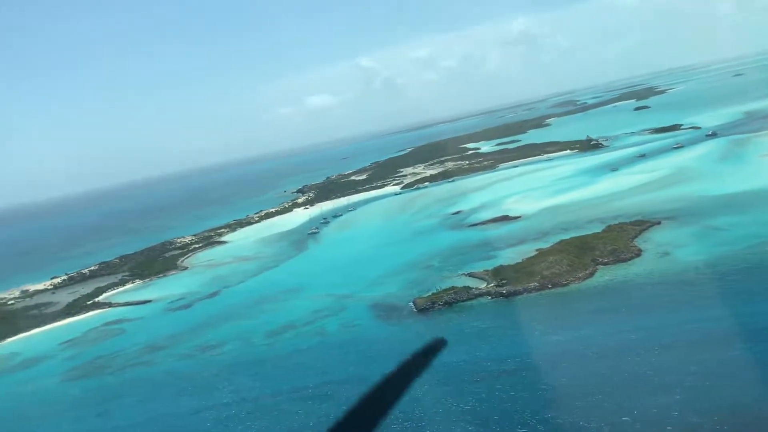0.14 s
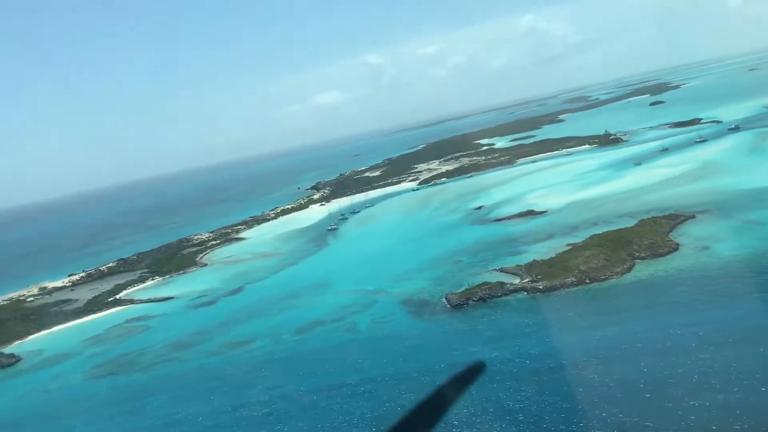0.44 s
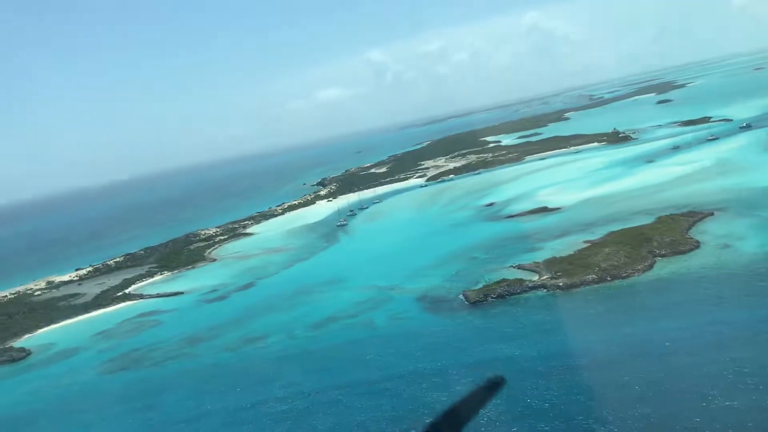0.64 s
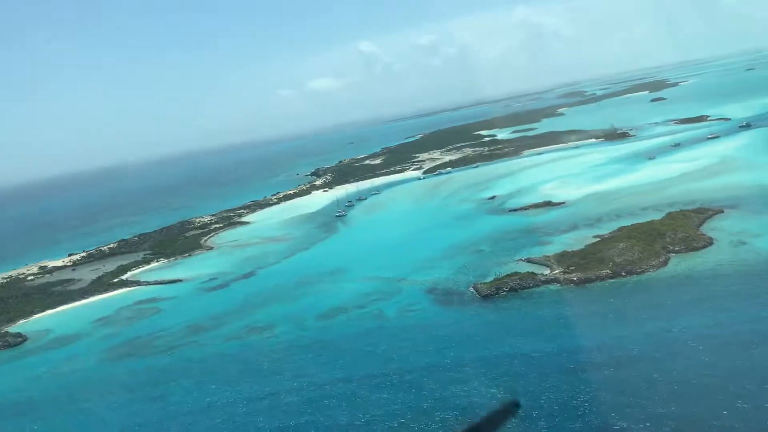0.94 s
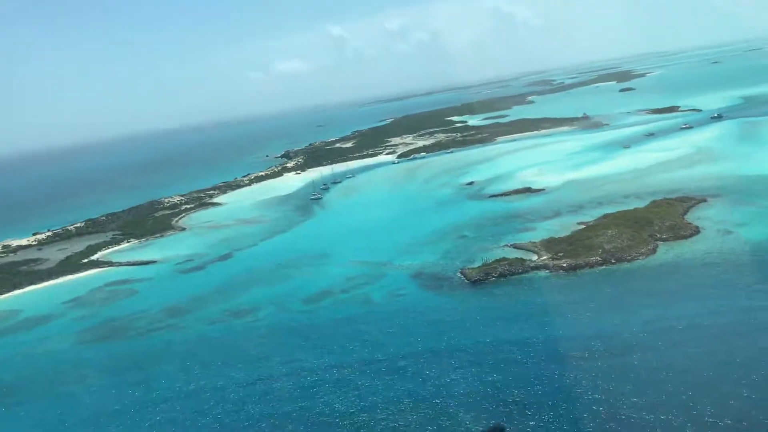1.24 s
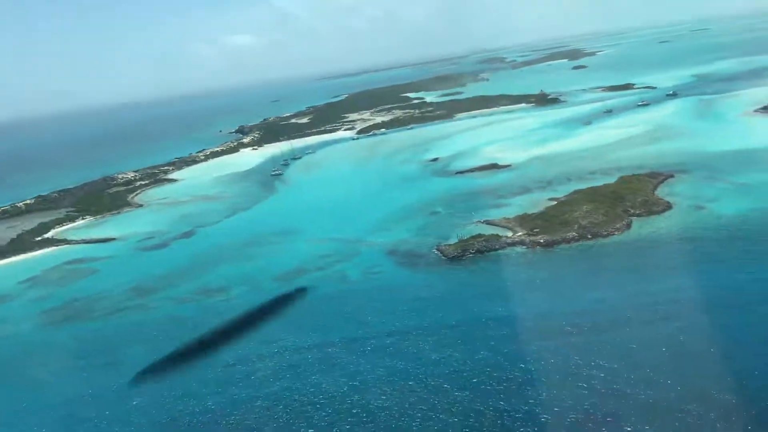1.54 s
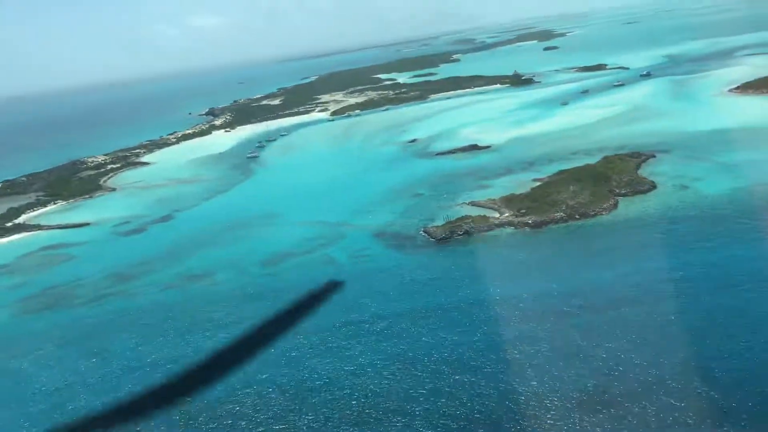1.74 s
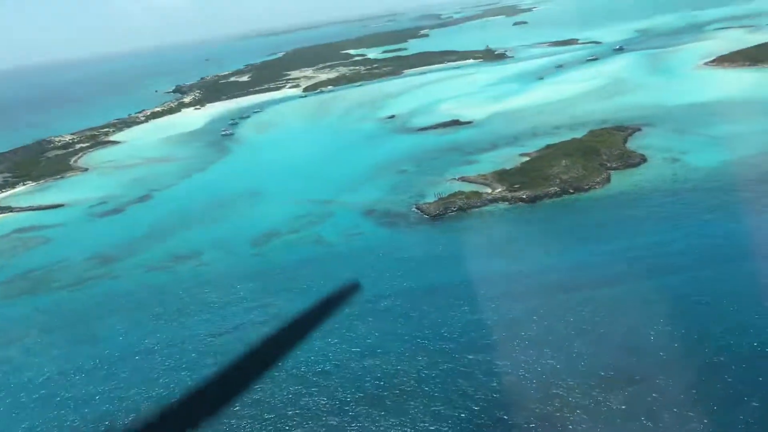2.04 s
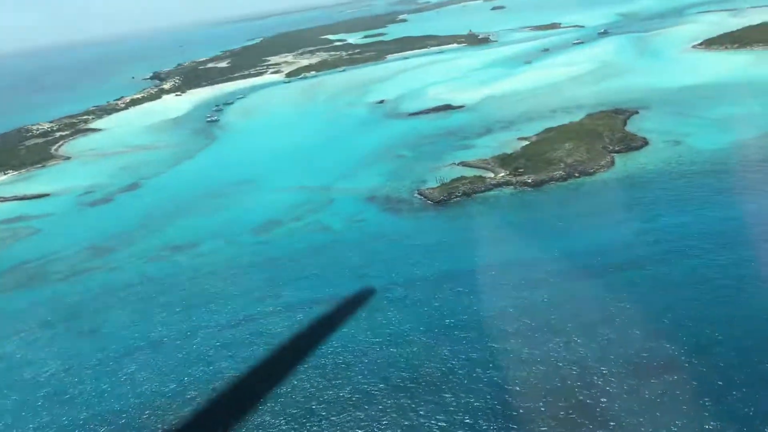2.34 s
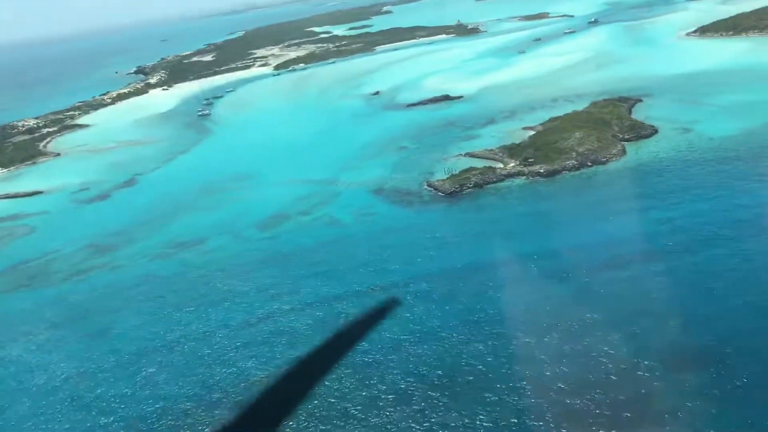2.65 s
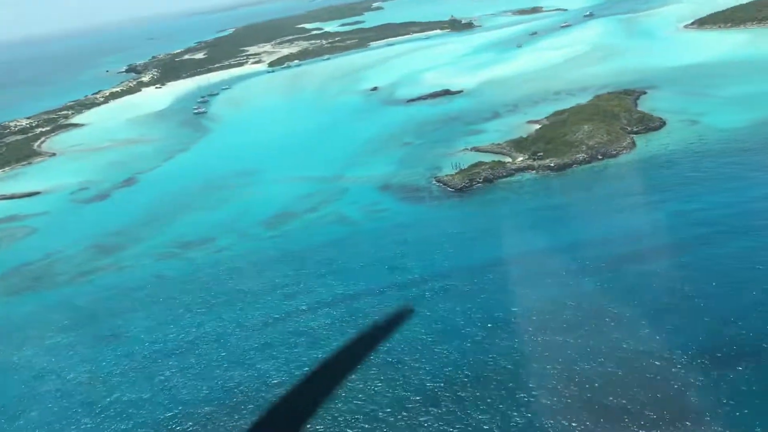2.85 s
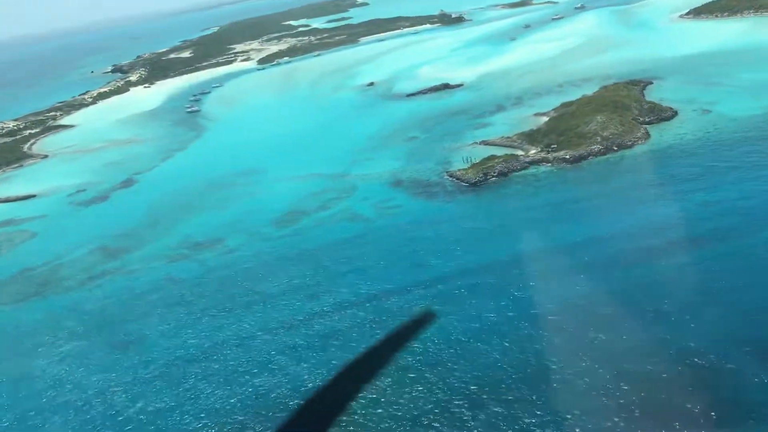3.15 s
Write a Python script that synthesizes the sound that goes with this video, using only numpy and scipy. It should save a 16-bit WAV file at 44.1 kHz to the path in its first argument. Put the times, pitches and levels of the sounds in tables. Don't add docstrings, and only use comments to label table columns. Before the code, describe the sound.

Twin piston engines of a small propeller plane drone in cruise, heard inside the cabin from a handheld camera by the window. The low hum starts weaker and rougher, swells to full by about 0.5 seconds, then throbs steadily, easing slightly near 2.3 seconds. Fuselage rumble and quiet air hiss continue throughout; a barely audible airy whistle fades around 1.6 seconds and returns toward the end at 3.3.

```python
import sys
import numpy as np
from scipy import signal
from scipy.io import wavfile
from scipy.ndimage import uniform_filter1d

SR = 44100
rng = np.random.default_rng(int(sys.argv[2]) if len(sys.argv) > 2 else 0)


def volts_from_decibels(level):
    exponent = np.asarray(level, float) / 20
    return 10 ** exponent


def wrap_up_sound(samples):
    columns = np.atleast_2d(samples).T
    tamed = np.clip(columns, -1, 1)
    steps = np.round(tamed * 32767).astype(np.int16)
    wavfile.write(sys.argv[1], SR, steps)


N = 145530
T = np.arange(N) / SR


def evened(x):
    return x / np.sqrt(np.mean(abs(x) ** 2) + 1e-20)


def curve(table, column):
    rows = np.array(table, float)
    return np.interp(T, rows[:, 0], rows[:, column])


def read_spectrum(points, hz):
    f, value = np.transpose(points)
    return np.interp(np.log(hz + 1), np.log(f + 1), value)


def noise(shape_db, patchy_db, streaky_db, size):
    streak_top_hz = 15000
    hz = np.fft.rfftfreq(size, 1 / SR)
    frames = 4 * N // size + 5
    real, imag, patches, streaks = rng.standard_normal((frames, len(hz), 4)).T
    patches = uniform_filter1d(patches, size=14, axis=0)
    patches = evened(uniform_filter1d(patches, size=20, axis=1))
    streaks = uniform_filter1d(streaks, size=2, axis=0)
    streaks = evened(uniform_filter1d(streaks, size=40, axis=1))
    streaks = streaks * np.clip(2 - 2 * hz / streak_top_hz, 0, 1)[:, None]
    level_db = shape_db(hz)[:, None] + patchy_db * patches + streaky_db * streaks
    spectra = (real + 1j * imag) * volts_from_decibels(level_db)
    sound = signal.istft(spectra, nperseg=size, noverlap=3 * size // 4)[1]
    return evened(sound[:N])


# time in seconds, level of engine order 6 (the firing) in dB, order 9 in dB,
# order 12 in dB, slipstream in dB, shaking of the airframe in dB.
FLIGHT = [(0, -45, -22, -30, -40.5, 1), (.2, -30.5, -21.5, -33.5, -37.5, 4), (.35, -17, -34, -27, -38, 2.5),
          (.5, -15.5, -25.5, -24, -37.5, 2.5), (.62, -13.5, -35, -23.5, -38, 1),
          (.85, -13, -31.5, -23, -38.5, 1), (1.15, -12.5, -31, -23, -40, 0.5),
          (1.4, -13, -24, -29, -40.5, -1.5), (1.62, -12.5, -23.5, -31.5, -41, -6),
          (1.85, -14, -29.5, -34, -41.5, -0.5), (2.12, -13, -28.5, -27, -41.5, -3.5),
          (2.28, -17, -28.5, -29, -40.5, -3), (2.45, -15.5, -29, -25, -40.5, -3.5),
          (2.62, -15.5, -41, -25.5, -40.5, -1.5), (2.78, -14.5, -22, -28, -40.5, -2),
          (2.92, -16, -30.5, -25, -39, -0.5), (3.05, -13.5, -31, -27, -41, 0),
          (3.3, -17.5, -28, -27, -38, -1.5)]


def shaking(share):
    return volts_from_decibels(share * curve(FLIGHT, column=5))


# time in seconds, engine cycles per second in Hz.
CYCLE_SPEED = [
    (0, 19.94),
    (.5, 19.93),
    (1.5, 19.91),
    (2.3, 19.93),
    (3.3, 19.945),
]
BEATING = (6, 9, 12)
# multiple of the cycle speed, level in dB (unused for the beating orders).
ORDERS = [(2, -26), (3, -14.5), (4, -22), (5, -15.5), (6, 0), (7, -26), (8, -29), (9, -14), (10, -25.5),
          (12, -13), (14, -35.5), (15, -25.5), (16, -37.5), (17, -33.5), (18, -25), (20, -39), (21, -38),
          (22, -44), (24, -35.5), (26, -45), (28, -53), (30, -41), (33, -43), (36, -48), (42, -41.5),
          (46, -42), (48, -53.5), (54, -44.5), (62, -48.5)]


def engines():
    wander, wander_hz = 0.4, 2.2
    weak_db, shaking_share = -13.5, 0.85
    slip_hz, aligned_s = 0.16, 0.9
    turn = 2 * np.pi * np.cumsum(curve(CYCLE_SPEED, column=1)) / SR
    coarse = T[::441]
    skin = shaking(shaking_share)
    drone = np.zeros(N)
    for k, db in ORDERS:
        if k in BEATING:
            level = volts_from_decibels(curve(FLIGHT, column=1 + BEATING.index(k)))
            phase = k * turn
            if k == 12:
                phase = phase + 2 * np.pi * slip_hz * (T - aligned_s)
            drone -= np.sqrt(2) * level * np.cos(phase)
            continue
        start = rng.random()
        phases = rng.random(12)
        rates = rng.exponential(1, 12) * rng.choice([-1, 1], 12)
        turns = np.exp(2j * np.pi * (wander_hz * rates * coarse[:, None] + phases))
        drift = 1 + wander * evened(turns.sum(1))
        drift = np.interp(T, coarse, drift.real) + 1j * np.interp(T, coarse, drift.imag)
        tone = (drift * np.exp(1j * (k * turn + 2 * np.pi * start))).real
        drone += np.sqrt(2) * volts_from_decibels(weak_db + db) * skin * tone
    return drone, turn


# pitch in Hz, level in dB per Hz.
RUMBLE_COLOUR = [(30, -22), (62, -1.5), (160, -3.5), (228, -9), (285, -8), (325, -15.5), (600, -37),
                 (3000, -95)]


def rumble():
    def shape_db(hz):
        return read_spectrum(RUMBLE_COLOUR, hz)
    return volts_from_decibels(-26.5) * shaking(1) * noise(shape_db, patchy_db=1.2, streaky_db=0, size=4096)


# pitch in Hz, level in dB per Hz.
STREAM_COLOUR = [(250, -16), (380, -7.5), (550, -13), (1300, -15), (2600, -23), (6600, -24.5), (8500, -30),
                 (15600, -39)]
# pitch in Hz, width in Hz, boost in dB.
PORTS = [(760, 53, -2.5), (910, 195, 4), (995, 58, -5), (2210, 140, 0.5), (2410, 110, -1),
         (4970, 440, -4.5), (6460, 1600, 1.5), (10600, 350, -2), (11040, 500, 5.5)]


def slipstream(turn):
    throb = 0.035
    def shape_db(hz):
        ringing = sum(db / (1 + (2 * (hz - f) / width) ** 2) for f, width, db in PORTS)
        return read_spectrum(STREAM_COLOUR, hz) + ringing
    chop = 1 + throb * np.cos(BEATING[0] * turn)
    level = volts_from_decibels(3.5 + curve(FLIGHT, column=4))
    return level * chop * noise(shape_db, patchy_db=0.9, streaky_db=2.1, size=1024)


# time in seconds, centre pitch in Hz, level in dB.
LEAK = [
    (0, 4210, -55),
    (.5, 4330, -53),
    (1.1, 4320, -55),
    (1.6, 4100, -68.5),
    (2.6, 3917, -60),
    (3.3, 3970, -45.5),
]


def leak():
    width_hz = 420
    r = np.exp(-np.pi * width_hz / SR)
    base = rng.standard_normal(N) + 1j * rng.standard_normal(N)
    slow = signal.lfilter([1], np.convolve([1, -r], [1, -r]), base)
    phase = 2 * np.pi * np.cumsum(curve(LEAK, column=1)) / SR
    whistle = evened((slow * np.exp(1j * phase)).real)
    return volts_from_decibels(curve(LEAK, column=2)) * whistle


def scene():
    drone, turn = engines()
    mix = drone + rumble() + slipstream(turn) + leak()
    return mix[None]


def roll_off(x):
    return signal.sosfilt(signal.butter(12, 15720, fs=SR, output="sos"), x)


def record(dry):
    low_cut_hz = 33
    low_cut = signal.butter(3, low_cut_hz, "high", fs=SR, output="sos")
    mix = signal.sosfilt(low_cut, dry)
    return roll_off(mix)


dry = scene()
out = record(dry)
wrap_up_sound(out)
```